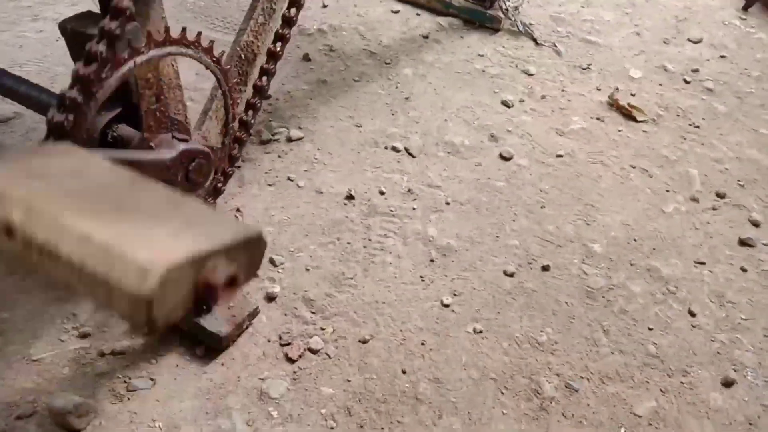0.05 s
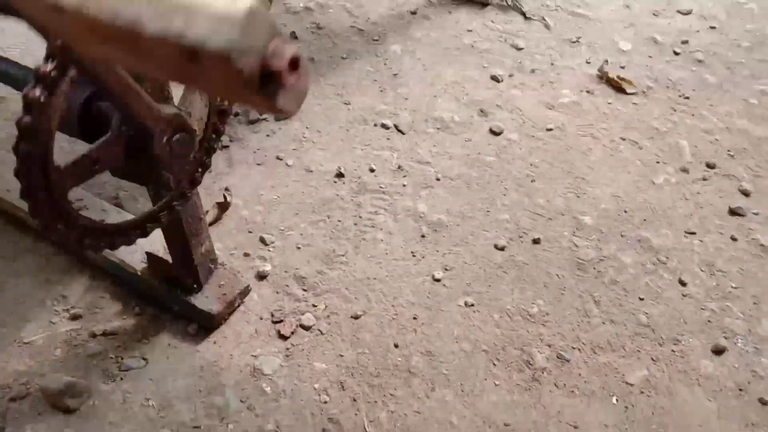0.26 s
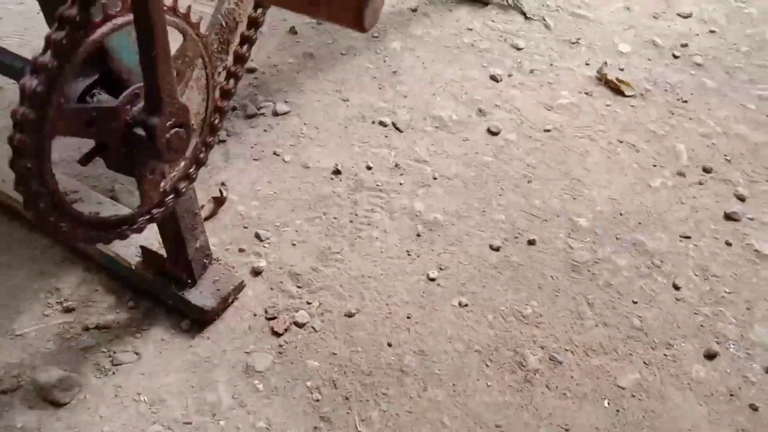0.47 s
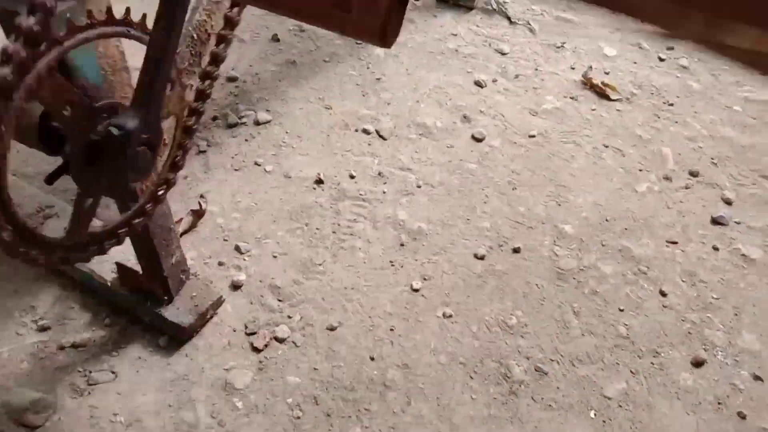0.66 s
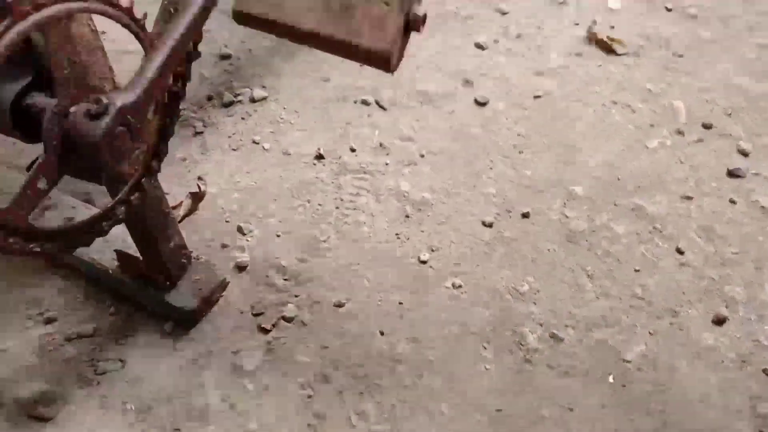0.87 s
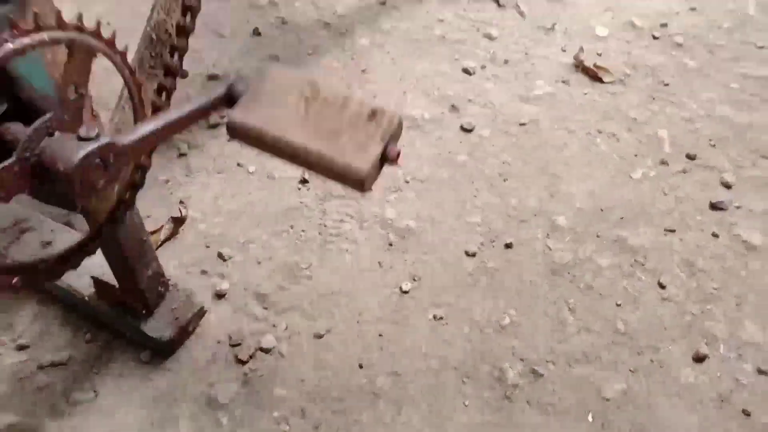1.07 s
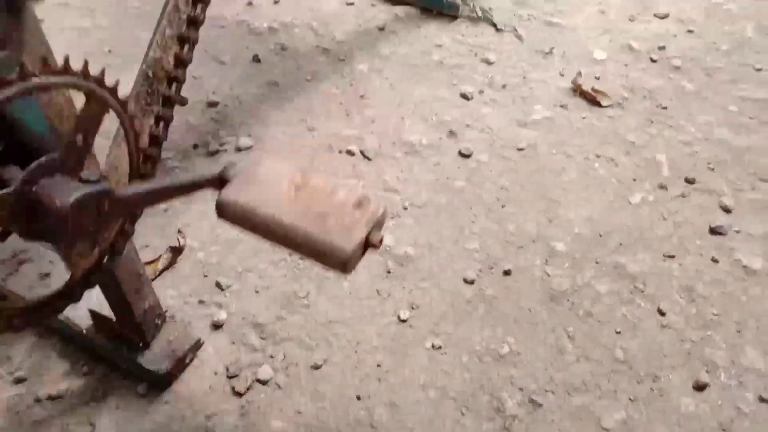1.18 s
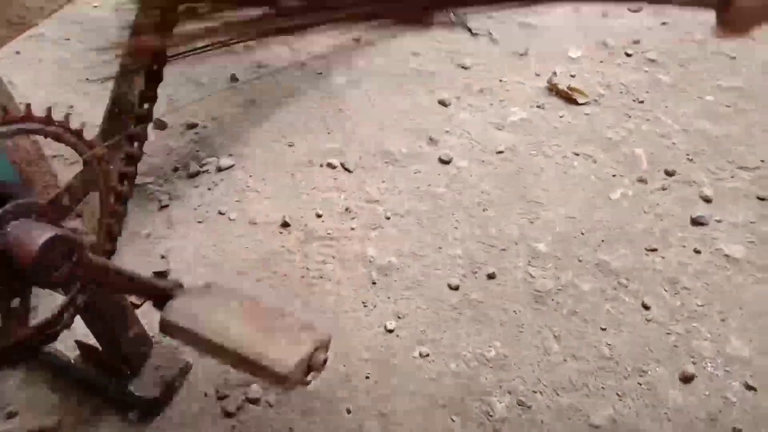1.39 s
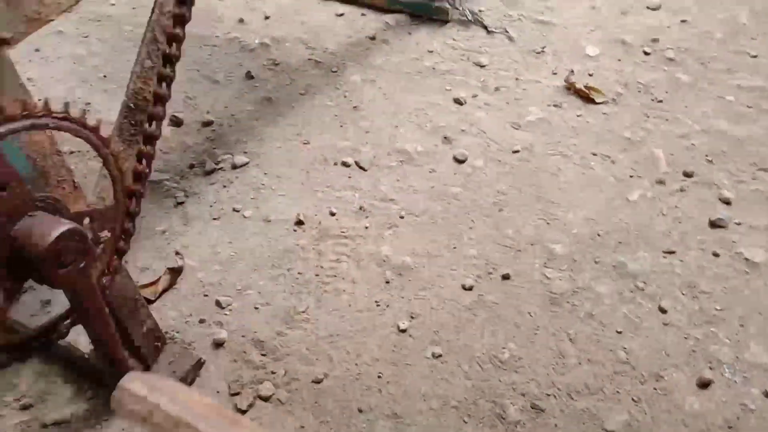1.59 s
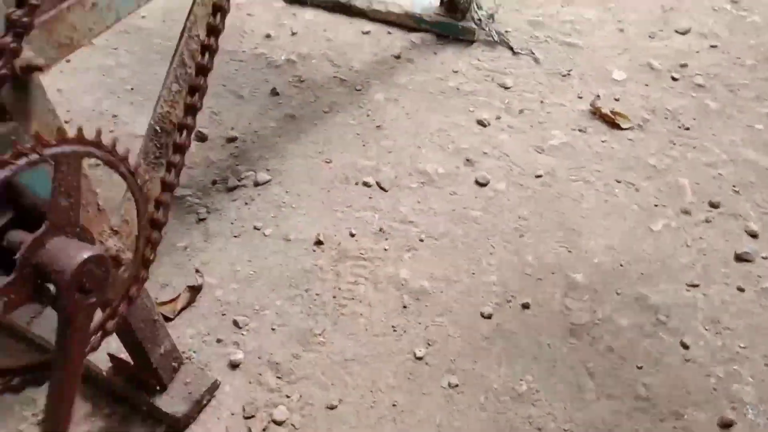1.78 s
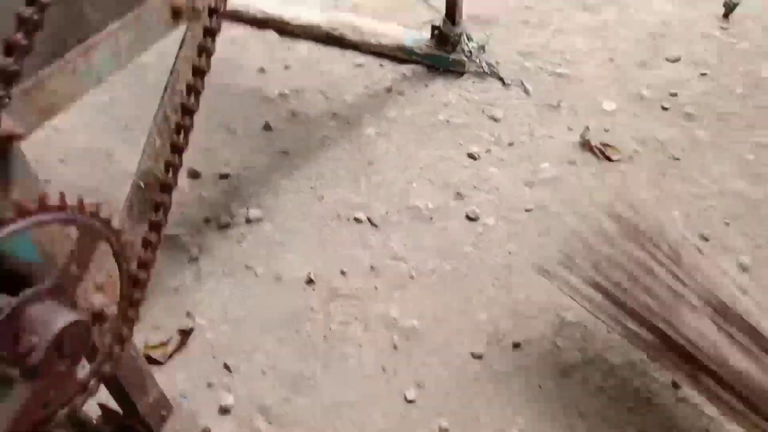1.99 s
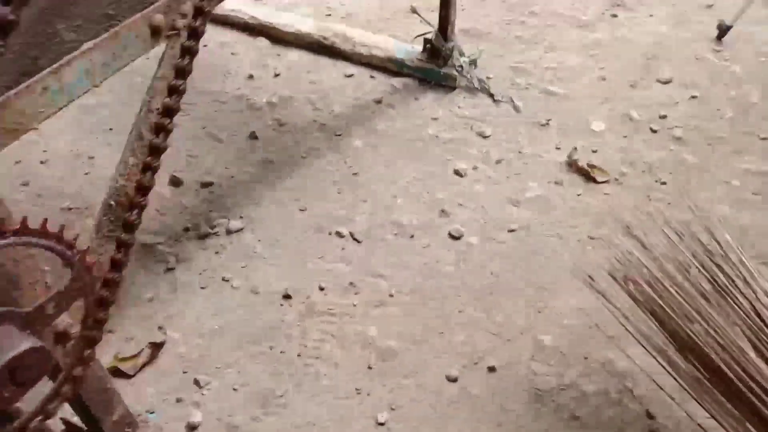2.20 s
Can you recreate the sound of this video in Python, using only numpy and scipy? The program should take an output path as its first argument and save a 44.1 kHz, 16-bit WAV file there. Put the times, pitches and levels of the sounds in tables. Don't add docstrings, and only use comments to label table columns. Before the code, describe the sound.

Stiff twig broom scraping rusty iron in quick uneven strokes, close up, then dragging over dirt

```python
import sys
import numpy as np
from scipy import signal
from scipy.fft import rfft, irfft
from scipy.io import wavfile
from scipy.ndimage import uniform_filter1d

SR = 44100
rng = np.random.default_rng(int(sys.argv[2]) if len(sys.argv) > 2 else 0)


def wrap_up_sound(samples):
    columns = np.atleast_2d(samples).T
    tamed = np.clip(columns, -1, 1)
    steps = np.round(tamed * 32767).astype(np.int16)
    wavfile.write(sys.argv[1], SR, steps)


def volts(x):
    e = np.asarray(x, float) / 20
    return 10 ** e


N = 99225
T = np.arange(N) / SR

# (time [s], pressure level [dB], heavy twigs re pressure [dB])
STROKES = [
    [(0, -54, 0), (.022, -53, 3), (.03, -60, 9.5), (.088, -74.5, 11), (.142, -73, 15), (.16, -65, 16)],
    [(.165, -57, -1), (.174, -45, -7), (.194, -53.5, 11), (.208, -38.5, -2), (.236, -28.5, -6),
     (.334, -29.5, -1), (.4, -40.5, 4.5)],
    [(.46, -47.5, 2.5), (.5, -49, 6), (.53, -61, -1), (.58, -66.5, 13), (.643, -73, 19)],
    [(.645, -39, -2), (.657, -51, 10), (.669, -44.5, 7), (.673, -35.5, -7), (.694, -31.5, 0),
     (.732, -43.5, 6), (.76, -35.5, -4.5)],
]
LATER_STROKES = [
    [(.775, -35, 5.5), (.83, -32, 1), (.875, -30.5, -3.5), (.93, -33, 2.5), (.945, -37, -0.5),
     (.962, -35.5, -1), (.97, -34, 4), (1.02, -36.5, 2.5), (1.03, -38, 1)],
    [(1.075, -44, 3.5), (1.132, -38.5, 2.5), (1.142, -46, 9), (1.174, -39.5, 0), (1.2, -51.5, 11.5),
     (1.245, -56.5, 12)],
    [(1.251, -43.5, 1), (1.334, -42.5, 3), (1.338, -32.5, -5), (1.4, -30, -4), (1.405, -32.5, 0),
     (1.498, -28, -0.5), (1.503, -34, 0), (1.536, -30, -1), (1.546, -39, 9.5)],
    [(1.56, -38, 5.5), (1.608, -46.5, 4), (1.638, -39.5, -4), (1.704, -50, 8), (1.8, -62, -7)],
]
# (time [s], level [dB], brightness [dB])
DRAG = [
    [(1.72, -74, -11), (1.734, -47.5, -25), (1.862, -35.5, -15.5), (1.888, -43, -19), (1.896, -32, -38),
     (1.9, -42, -38)],
    [(1.9, -38, -54), (2.012, -42.5, -47), (2.042, -53.5, -33), (2.076, -72, -5), (2.09, -70, -11),
     (2.1, -65.5, -12), (2.152, -83, 0), (2.25, -83, -6)],
]
# (time [s], peak level [dB], tail [s])
TUFTS = [(0.018, -29.5, 0.0041), (0.1698, -22.5, 0.003), (0.4035, -21, .004), (0.4287, -18, 0.0037),
         (0.447, -22.5, 0.0046), (0.5013, -24.5, 0.0039), (0.5256, -28.5, 0.0064), (0.538, -43, 0.005),
         (0.557, -37, 0.0066), (0.58, -36.5, 0.0047), (0.593, -44, 0.004), (.627, -45, 0.0045),
         (0.647, -39, 0.0069), (0.6602, -18, 0.0017), (0.785, -13, 0.0036), (0.971, -10.5, .005),
         (1.0882, -12, 0.01), (1.129, -14, 0.0043), (1.158, -20, .005), (1.213, -27, 0.0062),
         (1.232, -32, 0.0036), (1.415, -8.5, 0.0067), (1.557, -13, 0.0078), (1.646, -22, 0.0032),
         (1.728, -23.5, 0.0027), (1.894, -40, 0.0038), (0.161, -33, .002), (0.1765, -23, 0.0026),
         (0.206, -20, .004), (0.2205, -13, 0.0046), (0.232, -12, 0.0087), (0.272, -25, .002),
         (.286, -18, .003), (0.312, -11, .002), (0.321, -12, .002), (.3435, -24, .002), (0.3595, -14, .003),
         (0.6707, -15, 0.0024), (.6779, -7, 0.0028), (0.6804, -21, 0.0058), (0.694, -11.5, 0.004),
         (0.757, -21.5, .004), (.873, -21, .0015), (.9, -12, .003), (.995, -14, .003), (1.016, -14, .003),
         (1.1, -16, 0.0023), (1.1164, -18, .003), (1.249, -36, 0.0062), (1.337, -20, 0.0025),
         (1.36, -11, 0.0045), (1.3776, -20, .003), (1.397, -9, 0.0035), (1.469, -9, 0.0035),
         (1.498, -11, .002), (1.528, -9, .003), (1.535, -18, 0.005), (1.633, -21, 0.0046)]
# (time of peak [s], peak level [dB], pitch [Hz], length [s])
KNOCKS = [(.004, -48, 226, 0.0038), (0.472, -54, 616, 0.014), (0.474, -64, 966, 0.0084),
          (.47, -53.5, 1233, 0.0084), (0.946, -57, 990, 0.0023), (0.8, -44.5, 730, 0.0036),
          (0.8296, -28, 750, 0.0021), (.834, -38.5, 234, 0.01), (0.838, -38, 340, 0.0045),
          (0.925, -43.5, 397, 0.0016), (.935, -51, 150, 0.0085), (1, -47, 610, 0.0041),
          (1.011, -44, 241, 0.0073), (1.3926, -27, 1290, 0.0011), (1.395, -30.5, 1040, 0.0021),
          (1.3928, -34.5, 660, 0.0023), (1.397, -38.5, 380, 0.0021), (1.409, -36, 343, 0.0019),
          (1.417, -29, 620, 0.0021), (1.429, -33, 885, 0.0011), (1.457, -46, 578, 0.013),
          (1.497, -42, 645, 0.0043), (1.545, -50, 660, 0.0067), (1.558, -47, 172, 0.0039),
          (1.562, -51.5, 500, 0.0032), (1.668, -48, 586, 0.0039), (1.688, -53, 526, 0.009),
          (1.678, -44.5, 1120, 0.0024), (1.814, -46.5, 587, 0.016), (1.956, -53.5, 414, 0.016),
          (1.807, -47, 580, 0.0031), (2.214, -57, 785, 0.0048), (2.223, -67, 1500, 0.0015),
          (2.246, -67, 1390, 0.0023)]
# (time [s], peak level [dB])
TAPS = [(0.236, -34), (1.479, -52), (1.73, -36), (1.772, -38), (1.803, -36), (1.828, -32), (1.857, -23),
        (1.946, -35)]
# (time [s], level [dB], tail [s])
PEBBLES = [(1.726, -46, 0.0032), (1.8228, -44, .003), (1.8417, -41, .003), (1.924, -41, 0.0013),
           (1.94, -29.5, 0.0018), (1.996, -41, 0.0015), (2.014, -47, 0.004), (2.0827, -69, 0.0054),
           (2.097, -62, .002), (2.101, -65, 0.0021), (2.112, -59, 0.0016), (2.141, -73, 0.0013),
           (2.147, -73.5, .0015), (2.2209, -75, 0.0028)]
# (time [s], peak level [dB], pitch [Hz], length [s], glide [Hz/s])
SWELLS = [(0.096, -48, 112.6, 0.03, 150), (0.568, -46.5, 132, 0.015, 300), (.535, -51, 110, .025, 400),
          (1.712, -46.5, 116, 0.014, -200), (0.39, -54, 110, 0.02, -200), (0.94, -52, 95, 0.016, -500),
          (1.02, -54, 85, .03, 100), (1.95, -53, 140, 0.012, 100), (1.83, -55, 100, .02, 0)]
# (frequency [Hz], level per Hz [dB])
TIP_COLOUR = [(880, -67), (1500, -17.5), (6630, -0.5), (7700, -3.5), (8700, -11), (13500, -17),
              (14200, -8.5)]
# (frequency [Hz], level per Hz [dB])
HEAVY_COLOUR = [(300, -21.5), (500, -8.5), (900, -3), (1250, 3), (2500, -9.5), (5000, -22.5)]
# (frequency [Hz], level per Hz [dB])
DIRT_COLOUR = [(180, -49), (300, -31), (407, -14), (881, -16.5), (1250, -8), (1650, -3.5), (7240, -11),
               (8780, -25), (14000, -39.5)]
# (frequency [Hz], level per Hz [dB])
AIR_COLOUR = [(15, -58), (25, -33), (80, -14), (115, -2), (176, -1.5), (213, 2), (438, -23.5), (790, -18),
              (1030, -21), (7500, -41), (10000, -60)]
# (frequency [Hz], width [Hz], level [dB])
BAR_MODES = [(1267, 79, 15.5), (1259, 17, 14.5), (2030, 23, 17.5)]
# (frequency [Hz], width [Hz], level [dB])
PORT = [(6060, 470, 3), (6680, 250, -19.5), (7150, 290, 5.5), (15140, 620, 5), (15240, 750, 5)]

HEAVY_DB, TWIG_DB, TUFT_DB, SNAP_DB = -15.5, -11, -21.5, -21
BAR_DB, DIRT_BAR_DB = -20.5, -12
BRIGHT_PER_DB, BODY_PER_DB = 0.06, 1.2


def unit(x):
    return x / np.sqrt(np.mean(x ** 2))


def colour(x, points):
    hz, db = np.array(points, float).T
    grid = np.linspace(1, SR / 2, 2049)
    log_gain = np.interp(np.log(grid), np.log(hz), db) * np.log(10) / 20
    cepstrum = irfft(log_gain)
    cepstrum[1:2048] *= 2
    cepstrum[2049:] = 0
    return signal.fftconvolve(x, irfft(np.exp(rfft(cepstrum))))[:N]


def ring(x, hz, width):
    return signal.lfilter(*signal.iirpeak(hz, hz / width, fs=SR), x)


def walk(rate):
    hold = max(int(SR / rate), 101)
    steps = np.repeat(rng.standard_normal(N // 100), hold)[:N]
    return 1.2 * uniform_filter1d(steps, hold)


def curve(rows, col):
    p = np.array(rows, float)
    return np.interp(T, p[:, 0], p[:, col], left=-120, right=-120)


def decay(start, tail):
    return (T >= start) * np.exp(-np.abs(T - start) / tail)


def shelf(x, gain):
    low, high = [signal.sosfilt(signal.butter(2, 10900, kind, fs=SR, output="sos"), x)
                 for kind in ("low", "high")]
    return low - gain * high


def clicks(per_s, spread_db):
    hit = rng.random(N) < per_s / SR
    size = rng.exponential(size=N)
    sign = rng.standard_normal(N)
    return unit(hit * sign * volts(spread_db * size) + 0.3 * rng.standard_normal(N))


def twigs(x):
    width = 80
    pitches = np.geomspace(1900, 9000, num=24) * (1 + .03 * rng.standard_normal(24))
    out = np.zeros(N)
    for hz in pitches:
        out += ring(x * volts(4.2 * walk(24.62)), hz, width) * np.sqrt(hz / width / 15)
    return out


def bar(x, count=3):
    modes = sum(volts(db) * ring(x, hz, width) for hz, width, db in BAR_MODES[:count])
    return unit(modes) * np.std(x)


def tufts():
    burst = np.zeros(N)
    for s, db, tail in TUFTS:
        burst += volts(db + TUFT_DB) * decay(s, tail)
        burst += volts(db + SNAP_DB) * decay(s, .001)
    return shelf(colour(clicks(20000, 1) * burst, TIP_COLOUR), volts(2))


def strokes():
    rows = sorted(tuple(r) for s in STROKES + LATER_STROKES for r in s)
    level = curve(rows, 1)
    press = volts(level + 0.75 * walk(57.1) + 0.7 * walk(430))
    tips, heavy = clicks(5000, 1), clicks(2500, 3.4)

    scrape = tips * press
    rub = colour(scrape + volts(TWIG_DB) * twigs(scrape), TIP_COLOUR)
    rub = shelf(rub, volts(BRIGHT_PER_DB * (level + 18)))
    fine = (rub + tufts()) / np.std(colour(tips, TIP_COLOUR))

    push = heavy * press * volts(curve(rows, 2))
    body = colour(push * volts(BODY_PER_DB * (level + 30)), HEAVY_COLOUR)
    body = body / np.std(colour(heavy, HEAVY_COLOUR))
    return fine + volts(HEAVY_DB) * body + volts(BAR_DB) * bar(push)


def air():
    out = volts(-67.5 + 2.6 * walk(18)) * unit(colour(rng.standard_normal(N), AIR_COLOUR))
    hum = ring(rng.standard_normal(N), 107.5, 38) + 0.58 * ring(rng.standard_normal(N), 234.0, 26.5)
    out += volts(-64.0 + 0.77 * walk(6.55)) * unit(hum)
    for s, db, hz, length, glide in SWELLS:
        u = T - s
        out += volts(db) * np.exp(-(u / length) ** 2) * np.sin(2 * np.pi * (hz + glide * u / 2) * u)
    return out


def knocks():
    out = np.zeros(N)
    loose_db_per_s = 300
    for s, db, hz, length in KNOCKS:
        u = T - s
        shape = np.exp(-(u / np.where(u < 0, 0.61 * length, length)) ** 2)
        wobble = volts(min(length * loose_db_per_s, 5) * walk(200) / 2)
        rattle = unit(ring(rng.standard_normal(N), 0.8 * hz, hz * 1.1))
        rattle = rattle * (u > 0) * np.exp(-np.abs(u) / (4.1 * length))
        push = shape * wobble * np.cos(2 * np.pi * hz * u)
        out += volts(db) * (push + volts(-10 + loose_db_per_s * length) * rattle)
    return out


def taps():
    out = np.zeros(N)
    hz, t60, rise = 1261, 0.068, 0.0023
    for s, db in TAPS:
        u = np.clip(T - s, 0, None)
        shape = (1 - np.exp(-u / rise)) * np.exp(-np.log(1000) * u / t60)
        out += volts(db) * shape * np.sin(2 * np.pi * hz * u)
    return out


def drag():
    rows = sorted(tuple(r) for s in DRAG for r in s)
    grit = clicks(4000, 1.5)
    press = volts(curve(rows, 1) + 1.5 + 0.31 * walk(99))
    for s, db, tail in PEBBLES:
        press = press + volts(db) * decay(s, tail)
    dirt = shelf(colour(grit * press, DIRT_COLOUR), volts(curve(rows, 2) + 21))
    thin = signal.sosfilt(signal.butter(4, 1150, "high", fs=SR, output="sos"), dirt)
    weight = np.clip((T - 1.76) / .04, 0, 1)
    dirt = thin + (dirt - thin) * weight
    return dirt / np.std(colour(grit, DIRT_COLOUR)) + volts(DIRT_BAR_DB) * bar(grit * press, count=2)


def scene():
    return (strokes() + air() + knocks() + taps() + drag())[None]


def low_pass(x):
    return signal.sosfilt(signal.butter(12, 16870, fs=SR, output="sos"), x)


def record(dry):
    x = dry
    for hz, width, db in PORT:
        x = x + (volts(db) - 1) * ring(x, hz, width)
    x = .22 * np.tanh(x / .22)
    x = signal.sosfilt(signal.butter(2, 42, "high", fs=SR, output="sos"), x)
    over = np.linspace(0, SR / 2, N // 2 + 1) - 15490
    top_cut = volts(-np.clip(over / 2, 0, 42) - np.clip(over / 25, 0, 60))
    mix = irfft(rfft(x) * top_cut, N)
    return low_pass(mix)


dry = scene()
out = record(dry)
wrap_up_sound(out)
```